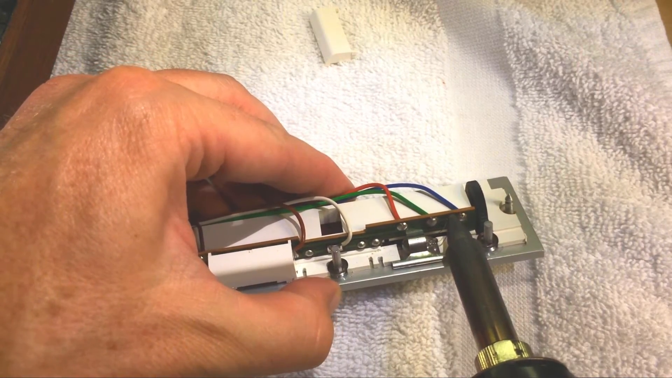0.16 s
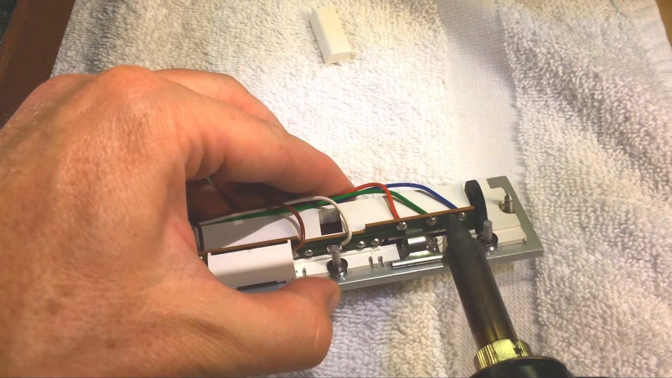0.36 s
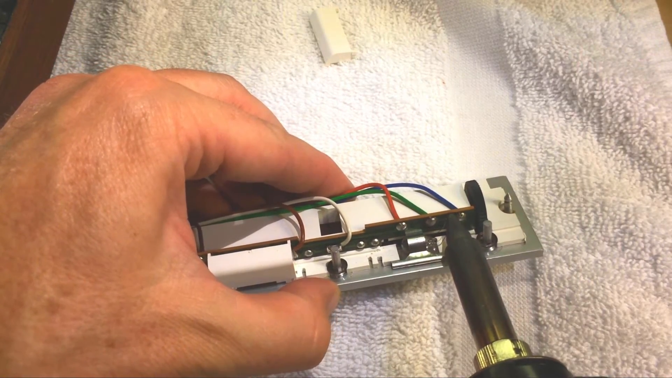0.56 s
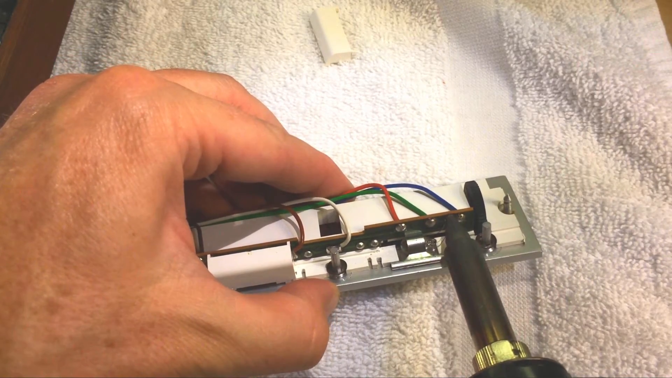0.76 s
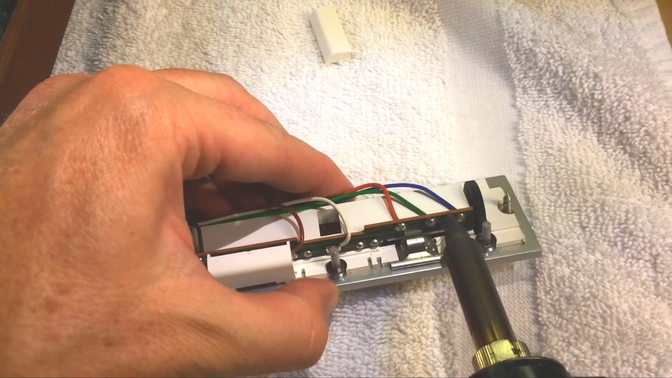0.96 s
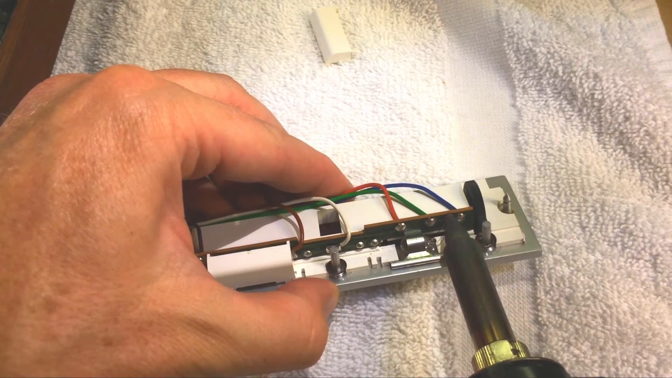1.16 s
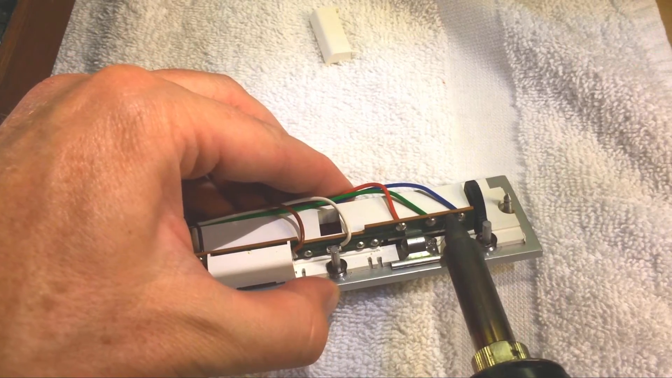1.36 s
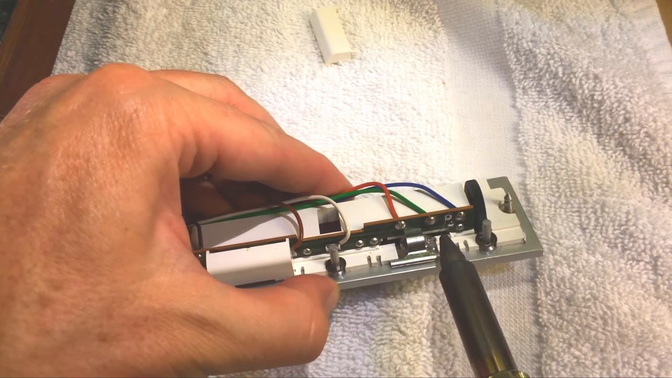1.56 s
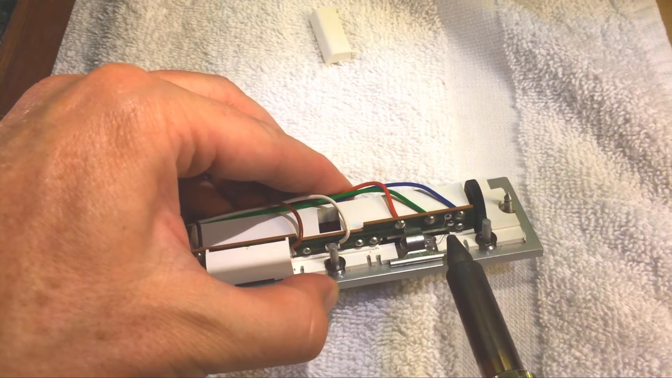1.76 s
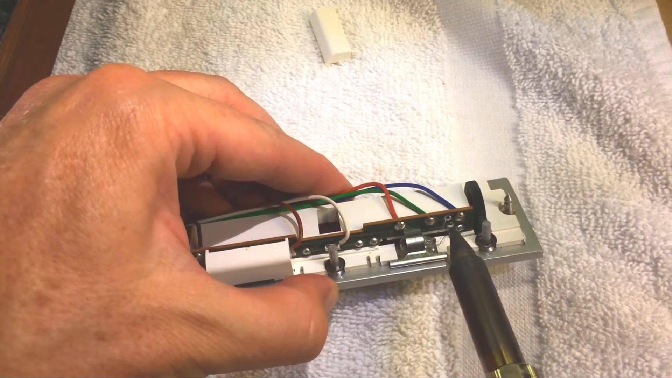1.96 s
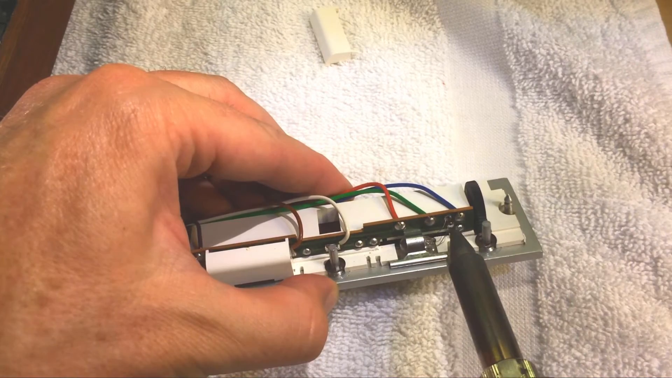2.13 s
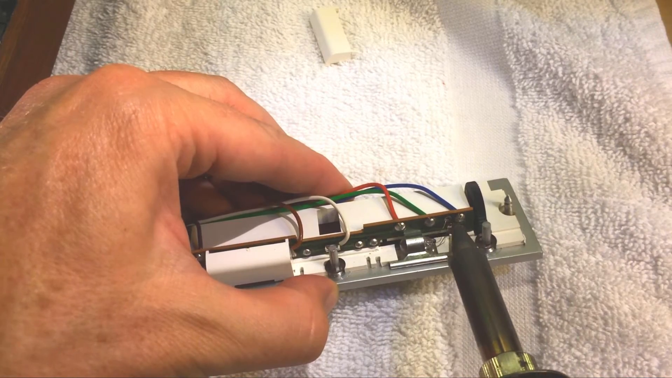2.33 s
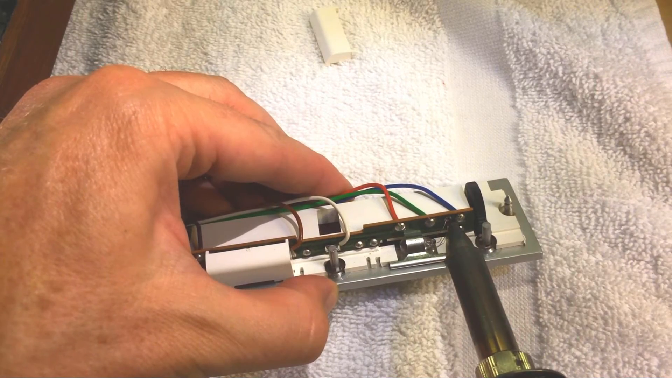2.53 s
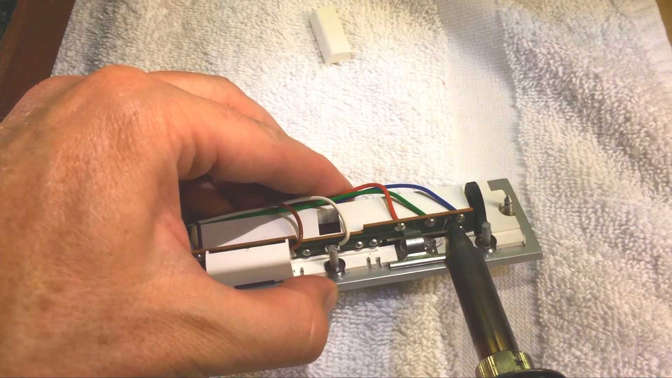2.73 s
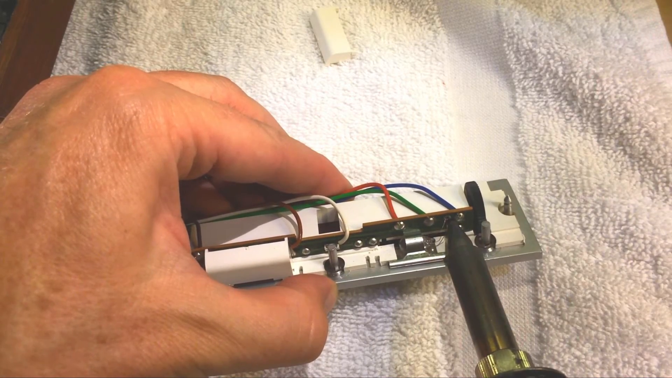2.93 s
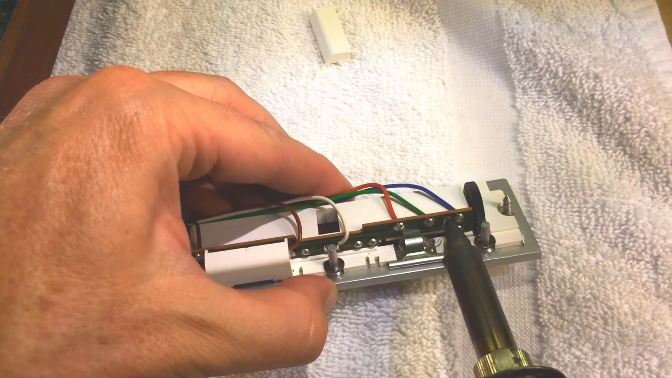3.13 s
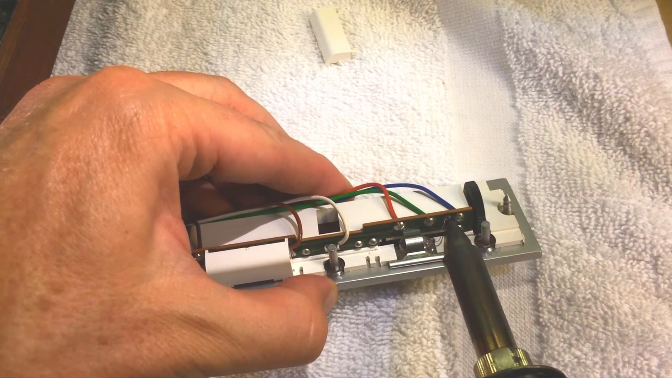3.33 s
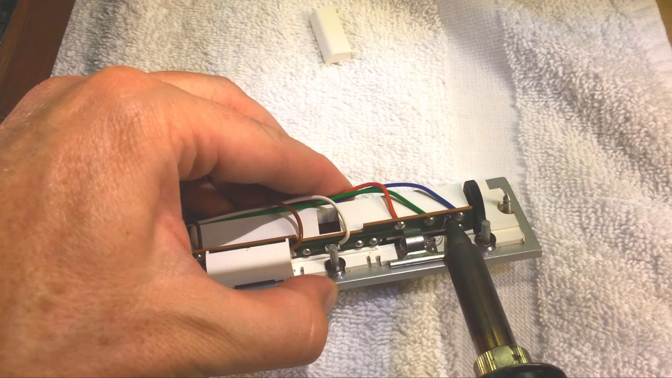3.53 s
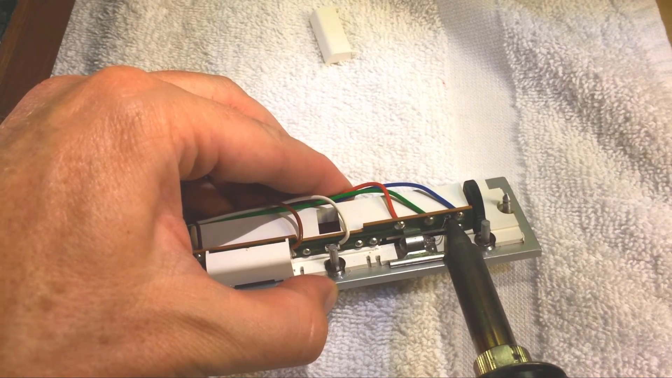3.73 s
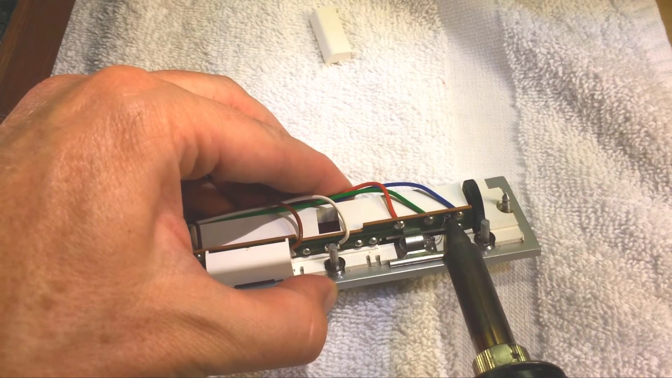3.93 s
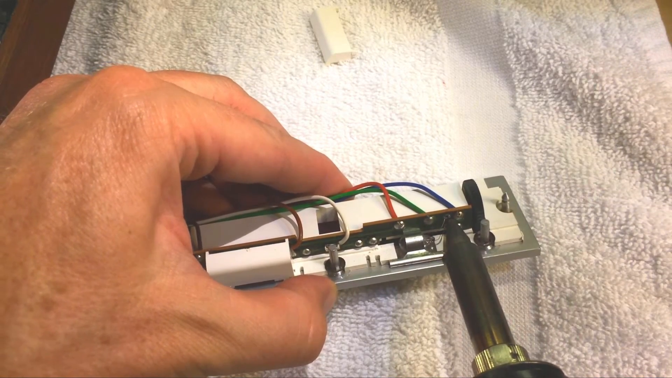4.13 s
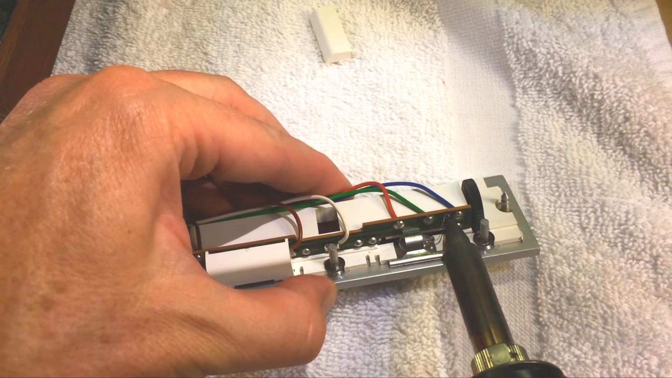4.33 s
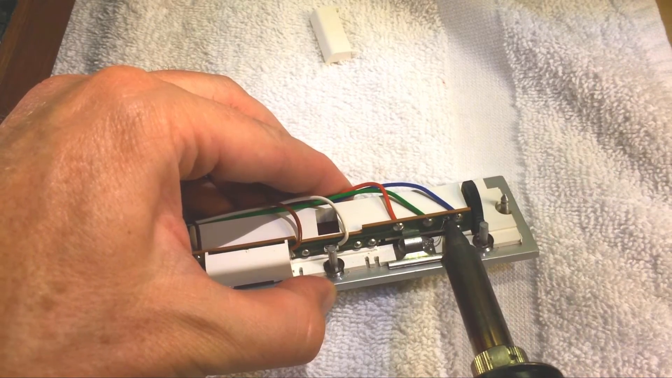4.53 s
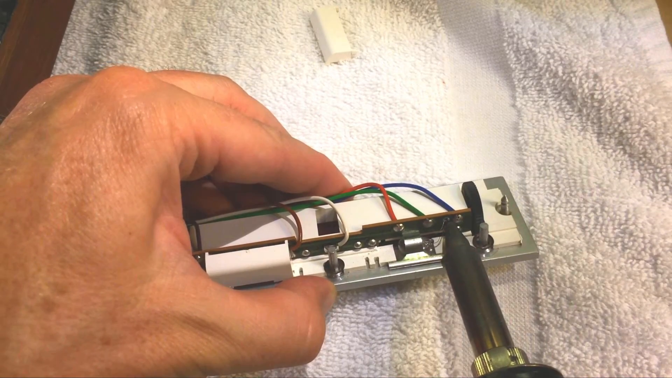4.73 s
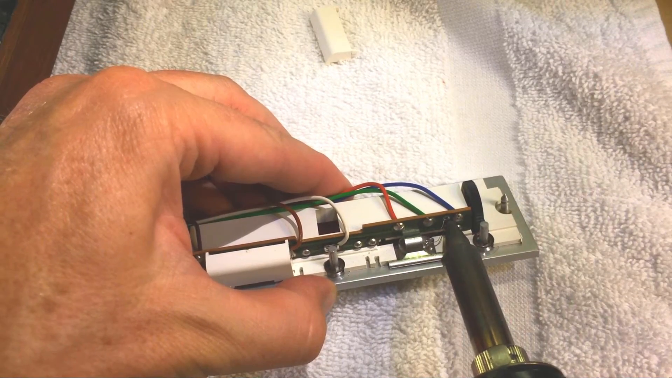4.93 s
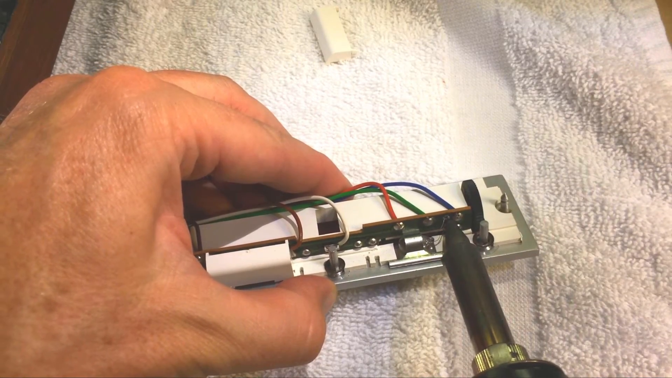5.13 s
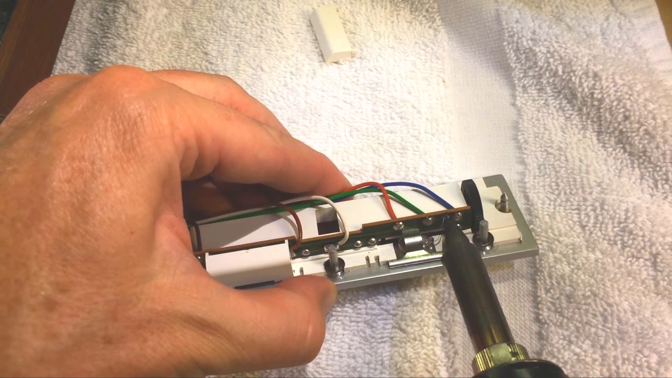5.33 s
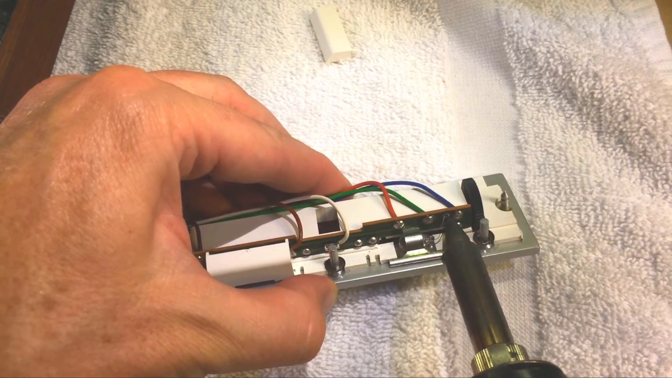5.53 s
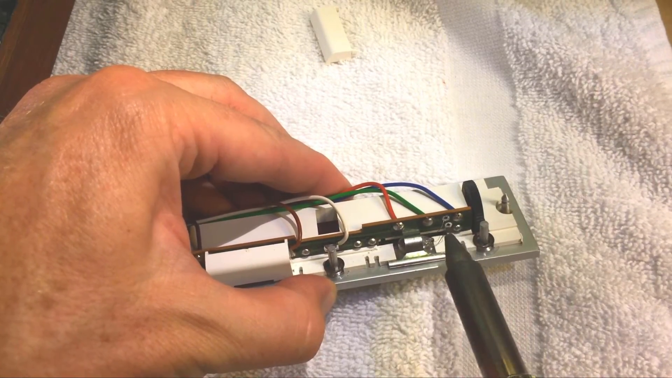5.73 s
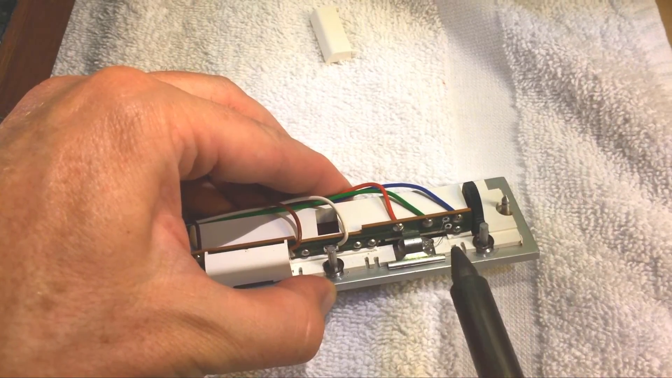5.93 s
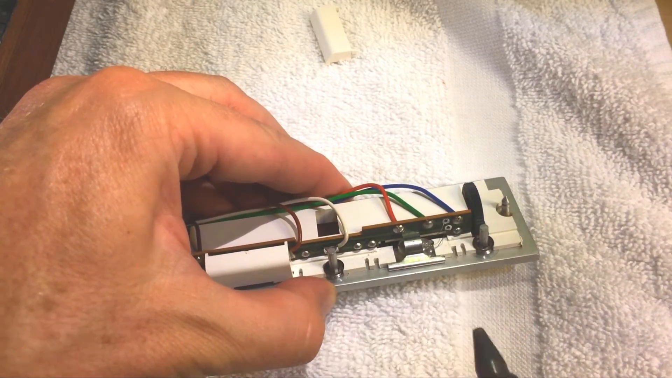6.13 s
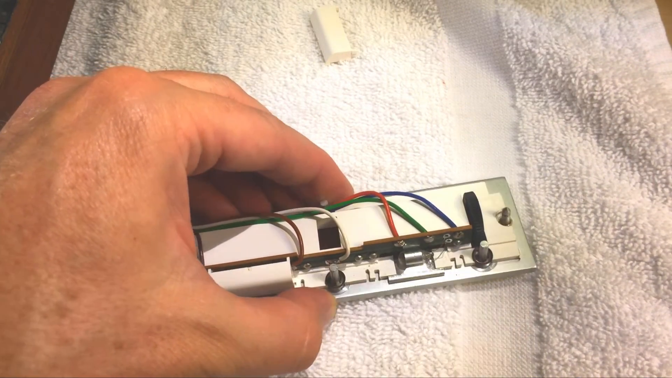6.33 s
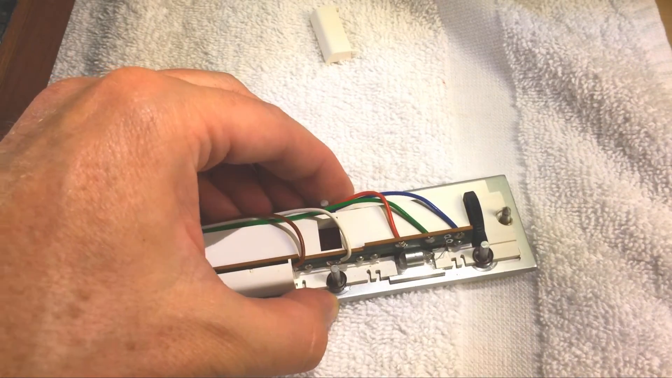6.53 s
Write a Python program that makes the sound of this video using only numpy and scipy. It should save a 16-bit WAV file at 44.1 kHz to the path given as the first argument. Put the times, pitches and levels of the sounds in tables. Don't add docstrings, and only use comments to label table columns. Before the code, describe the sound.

Close up in a quiet room, a handheld desoldering gun clicks on and buzzes harshly for about a second with pulsing air hiss, then clicks off and whirrs down. After a long near-silent pause it buzzes again, drops in pitch as the nozzle seals on a joint, rises briefly, and stops with a click.

```python
import sys
import numpy as np
from scipy import signal
from scipy.fft import rfft, irfft
from scipy.io import wavfile

SR = 44100
rng = np.random.default_rng(int(sys.argv[2]) if len(sys.argv) > 2 else 0)


def gain_from_db(level_db):
    decades = np.asarray(level_db, float) / 20
    return 10 ** decades


def pcm_store(signal):
    levels = np.round(np.clip(np.atleast_2d(signal), -1, 1) * 32767)
    wavfile.write(sys.argv[1], SR, levels.astype(np.int16).T)


N = 294720
VALVE_GAP_TURNS = 0.45


def rms_one(x):
    return x / np.sqrt(np.mean(x ** 2) + 1e-20)


def in_time(rows):
    s, *columns = np.transpose(rows)
    return [np.interp(np.arange(N) / SR, s, c) for c in columns]


def coloured(points):
    hz, table = np.fft.rfftfreq(N, 1 / SR) + 1, np.array(points)
    db = np.interp(np.log(hz), np.log(table[:, 0]), table[:, 1], left=-120, right=-120)
    return rms_one(irfft(rfft(rng.standard_normal(N)) * gain_from_db(db), N))


def lowpassed_noise(hz):
    return rms_one(signal.sosfilt(signal.butter(2, hz, fs=SR, output="sos"), rng.standard_normal(N)))


def band(x, low_hz, high_hz):
    return signal.sosfilt(signal.butter(2, [low_hz, high_hz], "band", fs=SR, output="sos"), x)


def swell(s, half_s, db):
    return gain_from_db(db) * np.exp(-((np.arange(N) / SR - s) / half_s) ** 2)


def stroke(turns, at, sharp):
    return np.exp(-sharp * ((turns - at) % 1))


def pump():
    speed, buzz_db, flow_db, running = motor()
    turns = crank_angle(speed)
    free, covered, sealed = nozzle()
    inlet = stroke(turns, 0, sharp=3.5)
    outlet = stroke(turns, VALVE_GAP_TURNS, sharp=8.0)
    puffs = inlet + (0.6 - 0.2 * sealed) * outlet

    strength = running * gain_from_db(buzz_db + 0.5) / np.sqrt(free ** 2 + covered ** 2 + sealed ** 2)
    slaps = strength * slap_train(turns, speed, jitter_s=0.00003, wobble_db=0.4)
    shaking = slaps + strength * gain_from_db(-17 - 3 * sealed) * turbulence(puffs, speed)
    buzz = housing_buzz(shaking, free, covered, sealed) + valve_snap(sealed * slaps)

    noises = gain_from_db(buzz_db - 13) * housing_rattle(puffs)
    noises += gain_from_db(flow_db - 14 - 1.5 * covered - 1.7 * sealed) * valve_hiss(puffs, sealed)
    noises += gain_from_db(flow_db - 14.7 - 3.5 * sealed + 1.5 * leak_opening()) * nozzle_air(turns, sealed)
    noises += gain_from_db(flow_db - 27 - 1.5 * covered - 3.7 * sealed) * bearing_whirr(puffs)
    noises += line_sigh() + valve_clatter(turns)
    return buzz, running * noises


# start_s, speed_turns_per_s, buzz_level_db
RUNS = [
    [(0.582, 75, -26), (0.768, 75.4, -28.5), (0.894, 74.6, -29.5), (1.21, 74.4, -30.5),
     (1.352, 73.5, -30.5), (1.48, 73.9, -30.5)],
    [(4.17, 75.2, -26.5), (4.62, 74.5, -31), (4.75, 67.4, -32.7), (4.832, 67, -32.5), (4.962, 65.1, -33),
     (5.128, 64.9, -33.5), (5.306, 66.1, -34), (5.46, 66, -33.5), (5.635, 64.8, -33.5), (5.715, 71, -32),
     (5.788, 73.0, -33.5)],
]
# after_pull_s, buzz_level_db, airflow_level_db
START = [
    (0, -26, -9),
    (0.013, -21, -49),
    (.024, 0, -4.5),
    (0.034, -2.5, -12),
    (.041, 2.5, -1),
    (.07, 0.22, -0.52),
]
# after_release_s, buzz_level_db, airflow_level_db
STOP = [
    (0, 0.5, 0),
    (0.021, -14.5, -5.5),
    (.034, -14, -52),
    (.078, -26, -34),
]


def motor():
    t = np.arange(N) / SR
    spin_up_s, start_lag_hz, run_down_hz_per_s = 0.035, 26.506, 150
    speed, buzz_db = in_time(sum(RUNS, []))
    flow_db, running = buzz_db.copy(), np.zeros(N)
    for run in RUNS:
        on, off = t - run[0][0], t - run[-1][0]
        live = (on > 0) & (off < STOP[-1][0])
        running += live
        speed -= live * start_lag_hz * np.exp(-np.abs(on) / spin_up_s)
        speed -= live * run_down_hz_per_s * np.maximum(off, 0)
        for since, rows in ((on, START), (off, STOP)):
            after_s, buzz_change, flow_change = np.transpose(rows)
            buzz_db += live * np.interp(since, after_s, buzz_change)
            flow_db += live * np.interp(since, after_s, flow_change)
    return speed, buzz_db, flow_db, running


def crank_angle(speed):
    rest_turns = 0.78
    turns = np.cumsum(speed) / SR + 0.0015 * lowpassed_noise(5)
    for run in RUNS:
        i = round(run[0][0] * SR)
        turns[i:] += (rest_turns - turns[i]) % 1
    return turns


# start_s, covered_share, sealed_share
NOZZLE = [
    (4.26, 0, 0),
    (4.32, 0.95, 0.0),
    (4.62, 0.95, 0.03),
    (4.73, 0.05, 0.95),
    (5.665, 0.02, 0.97),
    (5.69, 0.1, 0.3),
    (5.72, 0.02, 0.02),
]


def nozzle():
    covered, sealed = np.clip(in_time(NOZZLE), 0, 1)
    return np.clip(1 - covered - sealed, 0, 1), covered, sealed


def slap_train(turns, speed, jitter_s, wobble_db):
    whole = np.arange(1, int(turns[-1]) - 1)
    chance = rng.standard_normal((600, 2))[:len(whole)]
    at = np.interp(whole, turns, np.arange(N)) + jitter_s * SR * chance[:, 0]
    first, size = at.astype(int), gain_from_db(wobble_db * chance[:, 1])
    early = np.bincount(first, size * (first + 1 - at), N)
    late = np.bincount(first + 1, size * (at - first), N)
    return early + late


def turbulence(puffs, speed):
    rush = (2.5 + puffs) * band(rng.standard_normal(N), 1000, 19000)
    return rms_one(rush) * np.sqrt(speed / SR)


# turn_rate_multiple, level_db
FREE = [(1, -5.5), (2, -16.5), (3, -7.5), (4, 3), (5, -5), (6, -9.5), (7, 6), (8, -11), (9, 4), (10, -5),
        (11, -8), (12, -9), (13, -20), (14, -6), (15, -0.5), (16, -15.5), (17, 1.5), (18, -6), (19, 1),
        (20, -1.5), (21, -13), (22, -6), (23, -5.5), (24, 2), (25, -8), (26, 4.5), (27, 4.5), (28, -4.5),
        (29, -3.5), (30, -36), (31, -4.5), (32, -5.5), (33, -14), (34, -34.5), (35, -14), (36, -22.5)]
# turn_rate_multiple, level_db
COVERED = [(1, -5), (2, -15), (3, -7), (4, -5.5), (5, -3.5), (6, -12.5), (7, -5), (8, -1), (9, 1.5),
           (10, -5.5), (11, -16), (12, 4.5), (13, -5.5), (14, -8.5), (15, -5), (16, -6), (17, 0), (18, -6),
           (19, -2), (20, -1.5), (21, -12.5), (22, -15), (23, -2.5), (24, -4), (25, -6), (26, -5), (27, 2),
           (28, -6), (29, -5), (30, -11), (31, -6), (32, -27), (33, -15), (34, -9.5), (35, -46), (36, -23)]
# turn_rate_multiple, level_db
SEALED = [(1, -9.5), (2, -9), (3, -9), (4, -6), (5, -3), (6, -6), (7, -1.5), (8, 1.5), (9, -23), (10, -6),
          (11, -26), (12, -3), (13, -5), (14, 2), (15, -3.5), (16, -14), (17, 3), (18, -7.5), (19, -6),
          (20, 6.5), (21, 1), (22, 0.5), (23, -5), (24, -45), (25, -8), (26, -0.5), (27, 0), (28, -0.5),
          (29, 2), (30, -1.5), (31, -1.5), (32, -5.5), (33, -4), (34, -31), (35, -12), (36, -4.5), (37, -3),
          (38, -2), (39, -15.5), (40, -12)]


def housing_buzz(shaking, free, covered, sealed):
    buzz = housing(free * shaking, FREE, turn_hz=74.4, spread=0.45, split=0.63)
    buzz += housing(covered * shaking, COVERED, turn_hz=74.8, spread=0.061, split=0.75)
    buzz += housing(sealed * shaking, SEALED, turn_hz=65.5, spread=0.065, split=0.82)
    return buzz


def housing(slaps, orders, turn_hz, spread, split, size=8192):
    k, db = np.transpose(orders)
    order = np.fft.rfftfreq(size, 1 / SR) / turn_hz
    tail_db = db[-1] - 2.2 * (order - k[-1])
    level_db = np.where(order <= k[-1], np.interp(order, k, np.maximum(db, -23)), tail_db)
    level_db = np.clip(level_db - 40 * np.clip(0.8 - order, 0, 1), -60, 10)
    cepstrum = irfft(level_db * np.log(10) / 20)
    cepstrum[1:size // 2] *= 2
    cepstrum[size // 2 + 1:] = 0
    low = np.minimum(order, k[-1])
    lag = np.exp(-2j * np.pi * spread * (low - low ** 2 / 2 / k[-1]))
    gap, split = np.exp(-2j * np.pi * VALVE_GAP_TURNS * order), np.clip(split, 0, 0.9)
    valves = (gap - split) / (1 - split * gap)
    response = irfft(np.exp(rfft(cepstrum)) * lag * valves) * np.hanning(2 * size)[size:] ** 8
    per_turn = np.sqrt(2 * np.sum(gain_from_db(2 * db))) * turn_hz / SR
    return signal.fftconvolve(slaps, response / per_turn)[:N]


def valve_snap(sealed_slaps):
    plate = band(band(sealed_slaps, 3300, 4300), 3200, 4400)
    return gain_from_db(24.5) * (plate + 0.4 * band(sealed_slaps, 4800, 5500))


# pitch_hz, level_db (per Hz)
VALVE_HISS = [(1470, -2.5), (2500, -4), (2740, -4), (3020, 1.5), (3290, -2), (3810, 1), (4300, -5),
              (4790, -4), (5050, -4), (5220, -5.5), (6310, -12.5), (6620, -33), (7000, -27), (9100, -38),
              (15400, -120)]


def valve_hiss(puffs, sealed):
    return rms_one((0.65 - 0.19 * sealed + puffs) * coloured(VALVE_HISS))


# pitch_hz, level_db (per Hz)
NOZZLE_AIR = [(3530, -3), (6000, -3), (8060, -2), (9580, -7.5), (11100, -9), (13000, -14), (14700, -12),
              (15600, -18)]


def nozzle_air(turns, sealed):
    breath = 0.38 + 0.21 * sealed + stroke(turns, 0.0087, sharp=3.2)
    return rms_one(breath * coloured(NOZZLE_AIR))


def line_sigh():
    filling = sum(swell(run[-1][0] + 0.035, half_s=0.025, db=-75) for run in RUNS)
    return filling * coloured(NOZZLE_AIR)


# pitch_hz, level_db (per Hz)
HOUSING_NOISE = [(250, -16), (500, -15), (900, -4), (1600, -1), (2300, -5), (2900, -9), (3600, -28)]


def housing_rattle(puffs):
    return rms_one((0.18 + puffs) * coloured(HOUSING_NOISE))


def bearing_whirr(puffs):
    return rms_one(band((0.5 + puffs) * rng.standard_normal(N), 4840, 4960))


def valve_clatter(turns):
    clatter = rms_one(band(stroke(turns, 0.02, sharp=1.8) * rng.standard_normal(N), 4500, 5800))
    levels_db = (-38, -42)
    return clatter * sum(swell(run[0][0] + 0.064, 0.034, db) for run, db in zip(RUNS, levels_db))


# start_s (centre), half_length_s, pitch_hz, slide_hz_per_s, level_db
LEAK = [
    (4.818, 0.051, 8750, 3500, -50),
    (5.156, 0.064, 9660, 21200, -48),
]


def leak_opening():
    return sum(swell(s, half_s, 0) for s, half_s, *_ in LEAK)


def leak():
    t, whistle = np.arange(N) / SR, np.zeros(N)
    for s, half_s, hz, slide, db in LEAK:
        cycles = (hz + slide / 2 * (t - s)) * (t - s)
        whistle += swell(s, half_s, db) * np.sin(2 * np.pi * cycles)
    return lowpassed_noise(1500) * whistle


# start_s, level_db, t60_s
COASTS = [
    (1.5, -67, 0.78),
    (5.81, -65.5, 0.59),
]


def coasting():
    t = np.arange(N) / SR
    fade = sum((t > s) * gain_from_db(db - 60 * np.abs(t - s) / t60) for s, db, t60 in COASTS)
    return fade * rms_one(band(rng.standard_normal(N), 3900, 5300))


# start_s, level_db (peak)
CLICKS = [
    (0.5799, -34),
    (1.4883, -24),
    (4.1691, -31),
    (4.681, -38),
    (5.6594, -27),
    (5.79, -31.5),
    (5.9898, -61),
]
# pitch_hz, level_db, t60_s
TRIGGER = [(2540, -11, 0.006), (4400, -9, 0.005), (5900, -3.5, 0.0045), (7800, -7, 0.0021),
           (10750, -12, 0.003), (13500, -16, .003)]


def trigger():
    out, force = np.zeros(N), np.zeros(N)
    crackle = rng.standard_normal((len(CLICKS), 200)) * np.exp(-np.arange(200) / 60.0)
    for (s, db), burst in zip(CLICKS, crackle):
        start = round(s * SR)
        force[start:start + 200] += gain_from_db(db - 14) * burst
    for hz, db, t60 in TRIGGER:
        r, w = gain_from_db(-60 / (t60 * SR)), 2 * np.pi * hz / SR
        out += gain_from_db(db) * signal.lfilter([0, np.sin(w)], [1, -2 * r * np.cos(w), r * r], force + 1e-18)
    return out


# start_s (centre), half_length_s, level_db
RUSTLES = [
    (2.282, .03, -74),
    (6.3, 0.022, -77),
    (6.37, 0.038, -75),
]
# start_s (centre), half_length_s, level_db
BUMP = (4.69, .05, -43)


def handling():
    brushing = sum(swell(*row) for row in RUSTLES) * rms_one(band(rng.standard_normal(N), 3800, 7300))
    return brushing + swell(*BUMP) * rms_one(band(rng.standard_normal(N), 12, 50))


def room(x):
    t60_s, wet_db = 0.22, -7
    t = np.arange(SR // 2) / SR
    tail = rng.standard_normal(len(t)) * gain_from_db(-60 * t / t60_s) * (t > 0.006)
    tail = signal.sosfilt(signal.butter(1, 6000, fs=SR, output="sos"), tail)
    return gain_from_db(wet_db) * signal.fftconvolve(x, tail / np.sqrt(np.sum(tail ** 2)))[:N]


# pitch_hz, level_db (per Hz)
ROOM_TONE = [(8.8, -14), (15, 0.5), (87, -15), (171, -18.5), (226, -21.5), (369, -24.5), (511, -26),
             (588, -28), (1720, -33), (4000, -45.5), (5200, -57), (8800, -120)]
# pitch_hz, level_db (per Hz)
MIC_HISS = [(2350, -50), (4000, -13), (5050, 0), (5530, -0.5), (14500, -8), (15600, -12)]


def background():
    return gain_from_db(-51) * coloured(ROOM_TONE) + gain_from_db(-79) * coloured(MIC_HISS)


def scene():
    buzz, noises = pump()
    noises = noises + leak() + trigger() + coasting()
    echo = room(gain_from_db(-15) * buzz + noises)
    return (buzz + noises + echo + handling() + background())[None]


def top_cut(x):
    return signal.sosfilt(signal.butter(12, 15740, fs=SR, output="sos"), x)


def record(dry):
    notched = dry - 0.7 * band(dry, 7000, 7200)
    limited = signal.sosfilt(signal.ellip(10, 0.5, 60, 15500, fs=SR, output="sos"), notched)
    return top_cut(0.2 * np.tanh(limited / 0.2))


dry = scene()
out = record(dry)
pcm_store(out)
```